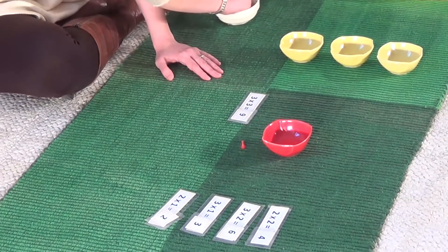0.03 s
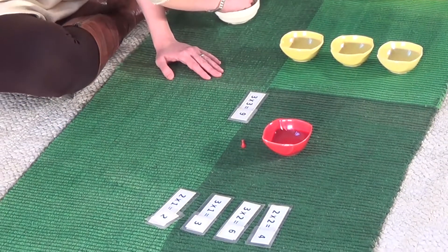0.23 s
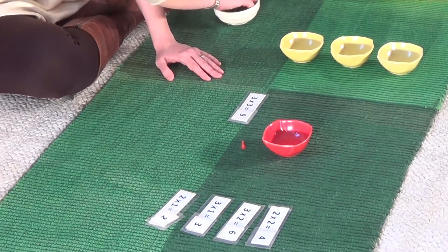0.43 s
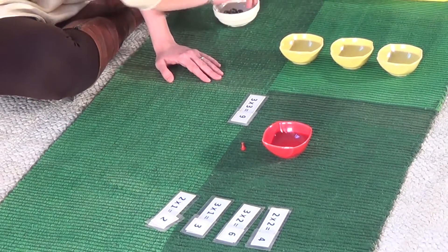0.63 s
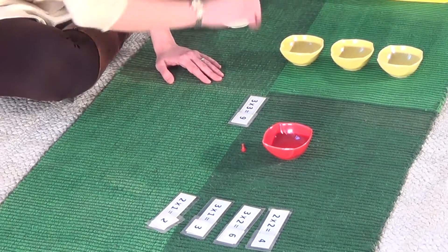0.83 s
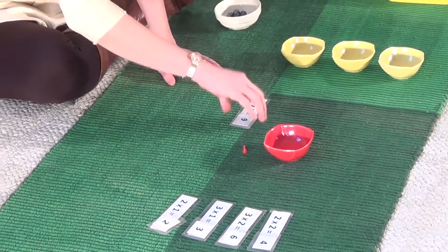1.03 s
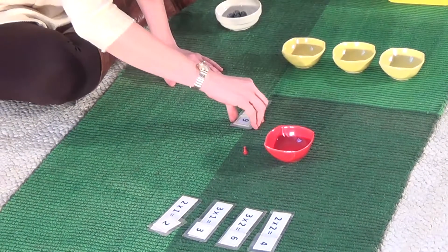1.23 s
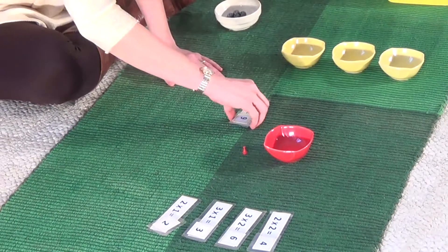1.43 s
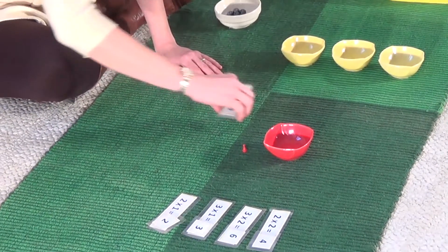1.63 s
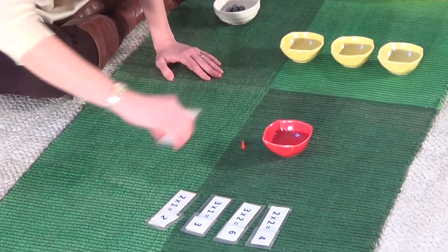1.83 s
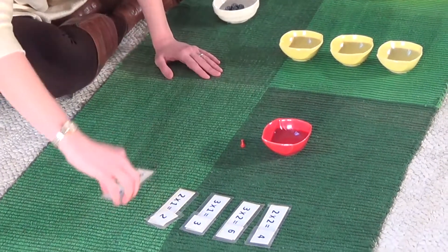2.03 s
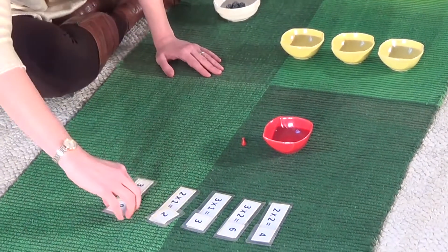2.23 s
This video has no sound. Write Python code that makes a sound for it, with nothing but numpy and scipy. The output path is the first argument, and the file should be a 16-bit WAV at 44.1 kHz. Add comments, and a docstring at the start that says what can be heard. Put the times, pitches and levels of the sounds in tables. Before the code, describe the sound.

Bright clinking of small pieces stirred in a china bowl, followed by soft pats.

```python
"""Stirring pieces in a china bowl

Close to a stereo microphone, fingers stir small hard pieces in a china bowl and pick one out; each knock
rings the bowl's high modes. Then the hand settles on a floor mat and lays down a card. The room is quiet
but live: hiss, mains hum, a faint far tone to the left, and the ticking of the camera's own tape drive."""
import sys
import numpy as np
from scipy import signal
from scipy.fft import rfft, irfft
from scipy.io import wavfile
from scipy.ndimage import uniform_filter1d

SR = 44100
rng = np.random.default_rng(int(sys.argv[2]) if len(sys.argv) > 2 else 0)


def wav_record(signal):
    """Record a signal, one row per channel, as 16-bit PCM in the file named by sys.argv[1]."""
    frames = np.transpose(np.atleast_2d(signal))
    bounded = np.clip(frames, -1, 1)
    # unit amplitude maps onto the largest positive 16-bit level
    quanta = np.round(bounded * 32767).astype(np.int16)
    wavfile.write(sys.argv[1], SR, quanta)


N = 105840
T = np.arange(N) / SR


def amp(db):
    """Decibels to gain."""
    return 10 ** (np.asarray(db) / 20)


def unit(x):
    """Scales to rms 1."""
    return x / np.sqrt(np.mean(x ** 2) + 1e-20)


def read(points, hz):
    """Reads a curve on a log-frequency axis."""
    f, value = np.transpose(points)
    return np.interp(np.log(hz + 1), np.log(f + 1), value)


def level(points):
    """Gain per sample from rows of t/s, level/dB."""
    return amp(np.interp(T, *np.transpose(points), left=-120, right=-120))


def add(mix, s, sound):
    """Mixes a sound in at time s."""
    part = mix[max(round(s * SR), 0):][:len(sound)]
    part += sound[:len(part)]


def colour(x, points):
    """Minimum-phase filter with the given spectrum."""
    log_gain = np.log(amp(read(points, abs(np.fft.fftfreq(2 * N, 1 / SR)))))
    response = np.exp(np.conj(signal.hilbert(log_gain)))[:N + 1]
    return irfft(rfft(x, 2 * N) * response)[:N]


def noise(points):
    """Steady noise of rms 1 with the given spectrum."""
    return unit(colour(rng.standard_normal(N), points))


def bursts(rows, decay_s):
    """Envelope of sharp bursts from rows of t/s, level/dB."""
    out = np.zeros(N)
    for s, db in rows:
        add(out, s, amp(db) * np.exp(-T[:SR // 10] / decay_s))
    return out


def grains(per_s, spread_db):
    """Random tiny impacts of uneven size."""
    impacts = (rng.random(N) < per_s / SR) * rng.choice([-1, 1], N)
    return impacts * amp(spread_db * np.minimum(rng.exponential(1, N), 3))


def cycle(first_s, period_s):
    """Time from the nearest beat of a steady cycle."""
    return (T - first_s + period_s / 2) % period_s - period_s / 2


# Room tone at the microphone: f/Hz, relative level/dB
ROOM_TONE_COLOUR = [(20, 1), (35, 3.5), (70, 5.5), (110, 0), (220, -0.5), (330, -1.5), (600, -9),
                    (850, -10.5), (1500, -16.5), (3000, -18.5), (6000, -21.5), (10000, -22.5), (13600, -25),
                    (14050, -15), (14500, -26), (16000, -16)]
def room_tone():
    """Steady low rumble and hiss of the quiet room."""
    return amp(-53) * noise(ROOM_TONE_COLOUR)


# Mains harmonics and the camera's whine: f/Hz, rms level/dB
HUM = [(50, -47.5), (100, -74), (150, -49.5), (250, -57.5), (350, -70.5), (450, -65), (750, -71),
       (15625, -68)]
def hum():
    """Steady mains hum and a thin whine, dead centre."""
    return sum(np.sqrt(2) * amp(db) * np.sin(2 * np.pi * (hz * T + rng.random())) for hz, db in HUM)


# Tick of the tape drive: f/Hz, relative level/dB
TICK_COLOUR = [(1500, -20), (2100, -8), (2430, 0), (2620, -7), (2830, 1), (3050, -2), (3500, -18),
               (6000, -35)]
def tape_drive():
    """Right by the microphone, the turning drive makes regular chirps and softer ticks."""
    t = cycle(first_s=.0015, period_s=.04)
    chirps = amp(-51) * np.exp(-(t / .003) ** 2 / 2) * np.sin(2 * np.pi * 2075 * t)
    t = cycle(first_s=.036, period_s=.0799)
    ticks = amp(-59) * np.exp(-(t / .0022) ** 2 / 2) * noise(TICK_COLOUR)
    return chirps + ticks


# Glide of the far tone: t/s, f/Hz, level/dB
FAR_TONE = [(1.4, 373.3, -83), (1.53, 480, -58), (1.73, 538, -63.5), (1.95, 513, -54), (2.151, 505, -63),
            (2.22, 391, -58), (2.321, 367, -54.5), (2.39, 350, -76)]
def far_tone(width_hz=36, right_db=-6.5):
    """A faint hollow tone far off to the left: a narrow, gliding band of noise."""
    s, hz, db = np.transpose(FAR_TONE)
    lowpass = signal.butter(2, width_hz / 2, fs=SR, output="sos")
    fuzz = unit(signal.sosfilt(lowpass, rng.standard_normal((2, N))))
    phase = 2 * np.pi * np.cumsum(np.interp(T, s, hz)) / SR
    tone = fuzz[0] * np.cos(phase) + fuzz[1] * np.sin(phase)
    return level(list(zip(s, db))) * tone * amp([[0], [right_db]])


# Decay of the room: f/Hz, T60/s
ROOM_T60 = [(200, 0.25), (1500, 0.39), (7500, 0.46), (11000, 0.29), (15000, 0.247)]
def echoes(x, gain_db=-4, onset_s=.0055):
    """The room returns a diffuse tail that dies soonest in the bass and the top treble."""
    reflections = rng.standard_normal(SR // 2) * (rng.random(SR // 2) < .1)
    hz, t, spectrum = signal.stft(reflections, SR, nperseg=256)
    decay = np.exp(-np.log(1000) * t / read(ROOM_T60, hz)[:, None])
    tail = signal.istft(spectrum * decay, SR, nperseg=256)[1]
    tail *= np.minimum(T[:len(tail)] / onset_s, 1) ** 2
    return amp(gain_db) * signal.fftconvolve(x, tail / np.linalg.norm(tail))[:N]


# Pats on the floor mat: t/s, level/dB, rise time/s
PATS = [(0.987, -48.5, .055), (2.326, -52.5, 0.018), (2.37, -52.5, 0.017)]
# Their dull thud: f/Hz, relative level/dB
PAT_COLOUR = [(40, -27), (100, -7.5), (160, -1.5), (240, -3), (380, -18.5), (800, -27.5), (2000, -36),
              (8000, -50)]
def pats():
    """Near the microphone, hand and card land softly on the mat."""
    push = np.zeros(N)
    for s, db, rise_s in PATS:
        add(push, s, amp(db) * T / rise_s * np.exp(1 - T / rise_s))
    return push * noise(PAT_COLOUR)


# Clinks of fingers and bracelet: t/s, level/dB
CLINKS = [(.104, -41.5), (.127, -42), (.14, -47), (.186, -57), (.192, -54.5), (1.054, -48.5), (1.063, -49),
          (1.078, -50), (1.095, -56)]
# Click of any hard contact, here and in the bowl: f/Hz, relative level/dB
CLICK_COLOUR = [(300, -35), (1200, -10), (3000, -27.5), (5500, -9.5), (7200, -6.5), (8300, 2), (9700, -4),
                (11500, -14.5), (14000, -18), (14700, -32), (16000, -38)]
def clinks():
    """Fingers and bracelet clink lightly, close up, in short bright bursts."""
    return bursts(CLINKS, decay_s=.0074) * noise(CLICK_COLOUR)


def tuning(s, rise, start_s=.36, glide_s=.35):
    """Pitch factor at time s: some modes rise as the load on the bowl eases."""
    return 1 + rise * np.clip((s - start_s) / glide_s, 0, 1)


# Pieces jostling between the knocks: t/s, level/dB
JOSTLE = [(.19, -89), (0.221, -48), (0.249, -48), (.298, -54), (.325, -38), (.44, -38.5), (0.551, -43),
          (.6, -43), (.8, -41), (.85, -49.5), (.93, -55), (1.0, -70)]
# Pieces scraping over the bowl's bottom: t/s, level/dB
SCRAPE = [(.1, -89), (0.109, -57), (.2, -82), (.208, -45), (.25, -45), (.3, -48), (.35, -43), (.47, -41.5),
          (.5, -50), (.56, -43), (.6, -60), (.8, -58), (.9, -70), (1.0, -71)]
# The dull scrape: f/Hz, relative level/dB
SCRAPE_COLOUR = [(100, -4), (160, -1), (260, 2), (550, -11), (950, -14), (1280, 0), (1650, -3), (1900, -8),
                 (2700, 2), (3200, -5), (4000, -1), (5500, -3), (7000, -8), (13500, -16), (15000, -38)]
# Modes of the bowl: f/Hz, T60/s, knocked gain/dB, jostled gain/dB, scraped gain/dB, pitch rise/fraction
BOWL_MODES = [(6798, 0.057, -2, -22, -4, .002), (7614, 0.033, 2, 1, -20, .012),
              (10240, .035, 1.5, -4, -4, .012), (13500, .045, -6, -15, 1, .002),
              (12200, .1, -21, -10, -18, 0), (15190, .1, -31, -32, -20, 0), (3953, .05, -18, -35, -3, 0),
              (1678, .1, -27, -38, -8, 0), (1279, .025, -32, -26, -5, 0.022)]
def jostle():
    """Close up, pieces tick against each other and scrape the bottom; both keep the bowl ringing."""
    ticks, scrapes = grains(per_s=1200, spread_db=4), grains(per_s=1200, spread_db=2.5)
    ticking, scraping = level(JOSTLE), level(SCRAPE)
    out = ticking * unit(colour(ticks, CLICK_COLOUR)) + scraping * unit(colour(scrapes, SCRAPE_COLOUR))
    for hz, t60, _, jostled_db, scraped_db, rise in BOWL_MODES:
        # a resonator that follows the mode's pitch
        phasor = np.exp(2j * np.pi * np.cumsum(hz * tuning(T, rise)) / SR)
        pole = np.exp(-np.log(1000) / t60 / SR)
        ring = phasor * signal.lfilter([1], [1, -pole], (ticks + scrapes) / phasor)
        out += np.hypot(amp(jostled_db) * ticking, amp(scraped_db) * scraping) * unit(ring.imag)
    return out


# Knocks on the bowl, relative levels: t/s, click/dB, first mode/dB, second mode/dB, third mode/dB
KNOCKS = [(0.2049, -24, -26, -25, -24), (0.2254, -25, -27, -35, -27), (0.2304, -25, -28, -32, -27),
          (0.2454, -28, -29, -33, -32), (0.2664, -31, -28, -36, -33), (0.2814, -28, -35, -26, -33),
          (0.3042, -23, -35, -20, -27), (0.3232, -23, -33, -24, -25), (0.3264, -23, -34, -21, -23),
          (0.3354, -24, -36, -23, -28), (0.3454, -23, -33, -23, -26), (0.3514, -23, -30, -25, -25),
          (0.3604, -25, -31, -21, -29), (0.3684, -23, -29, -24, -29), (0.3824, -24, -30, -24, -26),
          (0.4024, -25, -34, -24, -24), (0.4154, -26, -37, -25, -31), (0.4319, -22, -35, -27, -21),
          (0.4464, -22, -36, -24, -23), (0.4584, -24, -36, -24, -19), (0.4698, -19, -39, -19, -24),
          (0.4754, -25, -35, -24, -24), (0.4854, -20, -40, -20, -26), (0.4954, -25, -42, -20, -27),
          (0.5024, -20, -38, -19, -29), (0.5164, -22, -38, -21, -25), (0.5284, -26, -39, -25, -25),
          (0.5404, -22, -42, -22, -25), (0.5624, -28, -38, -21, -29), (0.5661, -21, -39, -20, -25),
          (0.5764, -28, -39, -19, -27), (0.5814, -27, -44, -18, -30), (0.5954, -25, -44, -17, -33),
          (0.6124, -27, -45, -18, -32), (0.6244, -29, -47, -21, -31), (0.6294, -27, -42, -17, -34),
          (0.6479, -28, -38, -18, -32), (0.6574, -30, -37, -19, -31), (0.6684, -28, -39, -19, -33),
          (0.6794, -28, -37, -21, -33), (0.6914, -26, -37, -21, -27), (0.7144, -28, -37, -21, -23),
          (0.7354, -25, -33, -19, -26), (0.7514, -25, -33, -18, -34), (0.7634, -30, -39, -21, -30),
          (0.7754, -27, -39, -19, -29), (0.7824, -27, -39, -23, -29), (0.7914, -27, -39, -24, -35),
          (0.8024, -29, -38, -22, -34), (0.8104, -29, -36, -25, -33), (0.8314, -33, -39, -27, -35),
          (0.8444, -33, -39, -31, -35)]
def knocks(ring_db=5, click_db=-3, contact_s=.00056, detune=.0021, scatter_db=1):
    """Each close knock is a click and a short ring; where it lands sets the strength of each mode."""
    rings, t = np.zeros(N), T[:SR // 5]
    attack = np.sin(np.pi / 2 * np.minimum(t / contact_s, 1)) ** 2
    for s, _, *mode_db in KNOCKS:
        for k, (hz, t60, knocked_db, _, _, rise) in enumerate(BOWL_MODES):
            pitch_draw, level_draw, phase = rng.standard_normal(3)
            # beyond the first three, low modes follow the first and high ones the third
            leader_db = mode_db[0] if hz < 7200 else mode_db[2]
            strength_db = mode_db[k] if k < 3 else leader_db + scatter_db * level_draw
            pitch_hz = hz * tuning(s, rise) * (1 + detune * pitch_draw)
            envelope = amp(knocked_db + strength_db + ring_db) * attack * np.exp(-np.log(1000) * t / t60)
            add(rings, s, envelope * np.sin(2 * np.pi * (pitch_hz * t + phase)))
    clicks = bursts([row[:2] for row in KNOCKS], decay_s=.0012) * noise(CLICK_COLOUR)
    return rings + amp(click_db) * clicks


# Spread of the echoes, side against mid: f/Hz, gain/dB
ECHO_SIDE = [(100, -24), (380, -3), (700, 6), (1300, 9.5), (2400, 6), (4400, -1.5), (8000, -7),
             (11000, -10), (15000, -19)]
# Spread of the room tone, side against mid: f/Hz, gain/dB
ROOM_TONE_SIDE = [(60, -41.5), (150, -24), (290, -9.5), (640, -0.5), (1400, 3.5), (3100, 0.5), (6800, -10),
                  (10000, -21), (15000, -37)]
def scene():
    """Bowl and hand are close and central; echoes and room tone spread to the sides."""
    near = knocks() + jostle() + pats() + clinks()
    mid = near + echoes(near) + room_tone() + hum() + tape_drive()
    side = colour(echoes(near), ECHO_SIDE) + colour(room_tone(), ROOM_TONE_SIDE)
    return np.array([mid + side, mid - side]) + far_tone()


# Balance of the microphone pair: f/Hz, left minus right/dB
LEFT_LEAN = [(180, 0), (380, 2), (700, 4), (1300, 3), (2400, 1.3), (4400, -0.5)]
def record(dry, limit_db=-12.5, recover_db_per_s=348.5, attack_s=.00052, cutoff_hz=15800):
    """The left microphone is fuller in the mids; a quick limiter ducks peaks; a low-pass follows."""
    lean_db = read(LEFT_LEAN, np.fft.rfftfreq(N, 1 / SR))
    x = irfft(rfft(dry) * amp([lean_db / 2, -lean_db / 2]), N)
    peak_db = 20 * np.log10(abs(x).max(0) + 1e-9)
    fall_db = recover_db_per_s * T
    held_db = np.maximum.accumulate(peak_db + fall_db) - fall_db
    duck_db = uniform_filter1d(np.maximum(held_db - limit_db, 0), round(attack_s * SR))
    lowpass = signal.firwin(511, cutoff_hz, window=("kaiser", 9), fs=SR)
    return signal.oaconvolve(x * amp(-duck_db), lowpass[None], "same")


dry = scene()
out = record(dry)
wav_record(out)
```